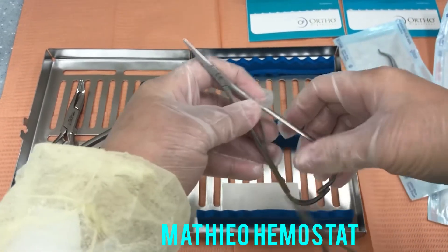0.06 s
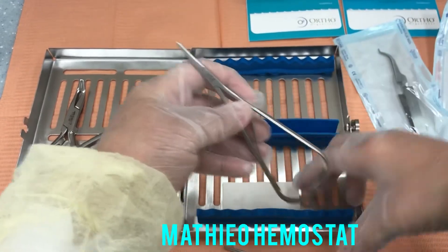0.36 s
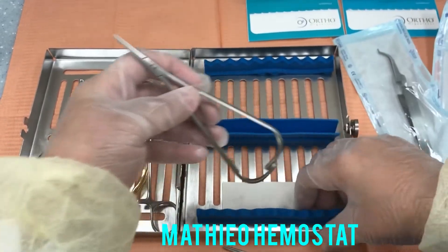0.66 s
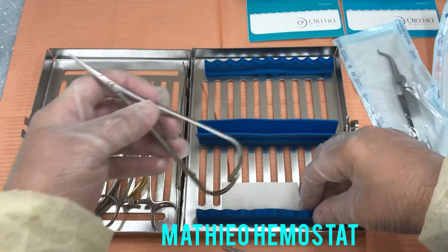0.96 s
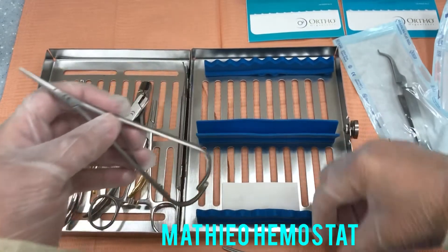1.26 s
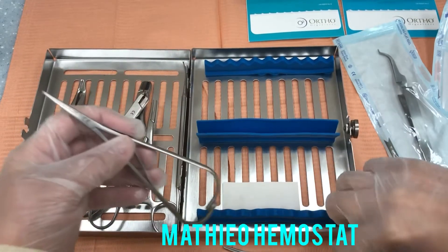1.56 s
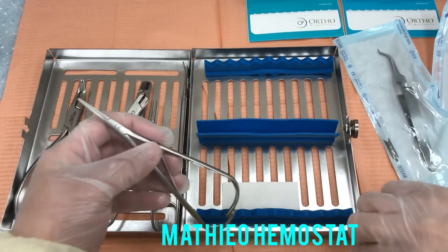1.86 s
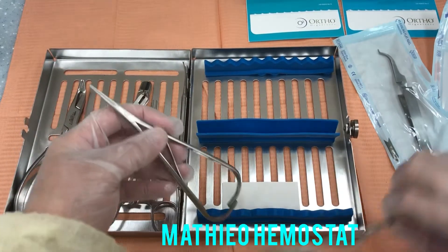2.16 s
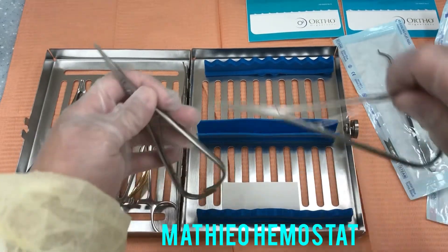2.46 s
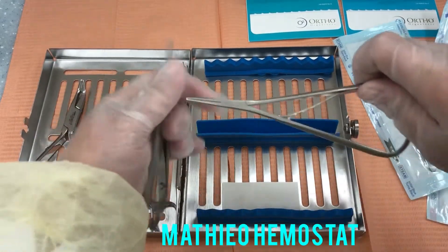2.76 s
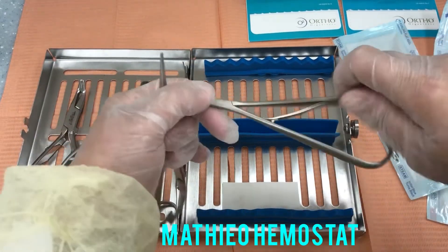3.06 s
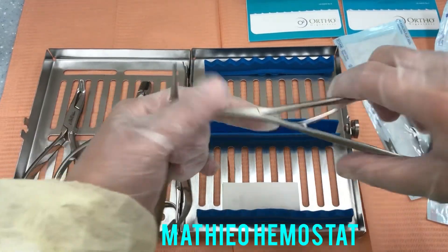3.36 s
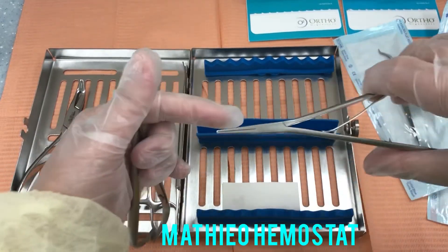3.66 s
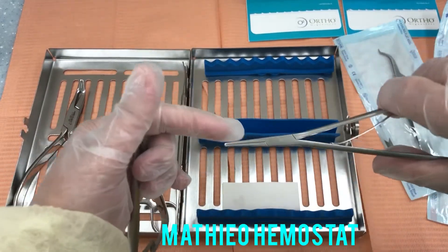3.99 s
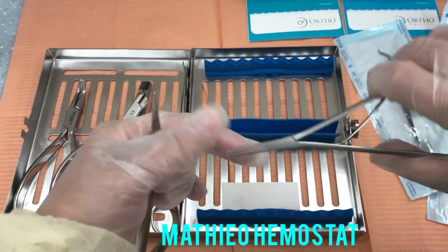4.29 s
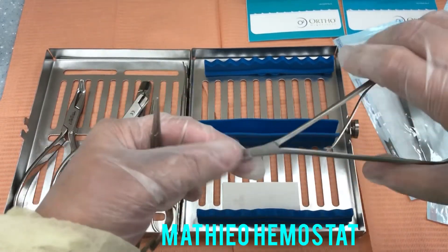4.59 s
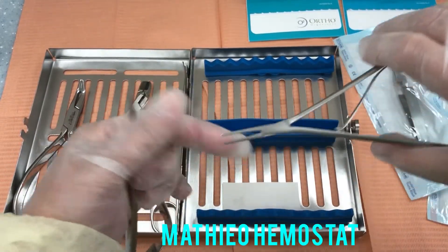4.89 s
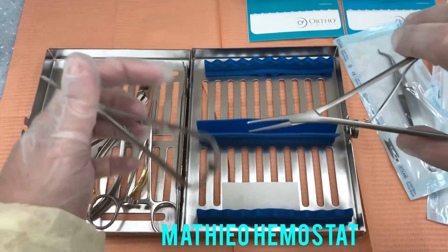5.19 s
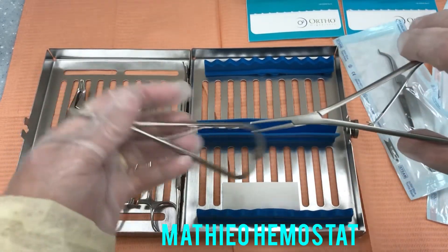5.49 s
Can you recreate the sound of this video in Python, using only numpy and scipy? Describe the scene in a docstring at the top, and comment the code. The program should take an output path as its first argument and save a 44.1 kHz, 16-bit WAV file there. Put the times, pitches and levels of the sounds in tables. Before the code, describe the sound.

Close up in a quiet clinic room, a steel instrument lands in a metal tray with a bright, bouncing clatter and a low thump from the table. Thin gloves rustle faintly. A softer scrape and clink follow, then a dull knock. Later a clamp's ratchet gives two sharp clicks and several lighter ones. Ventilation hums low throughout.

```python
"""A steel instrument, set into a slotted steel tray by gloved hands, clinks, bounces and slides.
Each contact is a chattering burst that rings tray and instrument; the table under them thumps.
A clamp is drawn out over the slots, its ratchet clicked shut tooth by tooth, then eased open.
Gloves rustle, ventilation hums, and a faint flutter echo runs between table and ceiling."""
import sys
import numpy as np
from scipy import signal
from scipy.fft import rfft, irfft, next_fast_len
from scipy.io import wavfile
from scipy.ndimage import uniform_filter1d, map_coordinates

SR = 44100
rng = np.random.default_rng(int(sys.argv[2]) if len(sys.argv) > 2 else 0)


def int16_out(signal):
    """Quantize to a 16-bit WAV file."""
    q = np.round(np.clip(np.atleast_2d(signal).T, -1, 1) * 32767)
    wavfile.write(sys.argv[1], SR, q.astype(np.int16))


N = 248724
T = np.arange(N) / SR
HIT_T = np.arange(2 * (SR // 4)) / SR
HIT_HZ = np.fft.rfftfreq(len(HIT_T), 1 / SR)

# crowded modes of the tray floor (frequency [Hz], gain [dB])
FLOOR_SPECTRUM = [(150, -11), (400, -12), (900, -11.5), (2400, -14), (5000, -15), (10000, -22),
                  (16000, -23)]


def tray_clinks():
    """An instrument lands and bounces; every contact sets the thin steel ringing."""
    # contacts (time [s], level [dB], low clank [dB], treble [dB], slide [dB], instrument [dB])
    clinks = [(.0905, -9.5, 0, 3, -14.5, 10.5), (.1252, -22, -2.5, -2, -5, -3),
              (0.139, -29.5, -2, 5, -7, -7), (0.1468, -28, 0.5, 3, -6, 1), (.1718, -36, -13, 6, -1.5, -8),
              (0.184, -27.5, -4, 2.5, -6, 2.5), (.191, -32.5, -3, -7, -6, -2),
              (.204, -34.5, -1, 5, -3.5, -10.5), (0.2424, -41.5, 11, -8, 1, -20),
              (0.249, -32, 5.5, 7, -33, -8), (0.2724, -21.5, 0, -6, -4.5, -5.5),
              (.2961, -36, 21, -29, -1, -20), (0.3226, -34, 6, -15, 4, -26),
              (1.8126, -29, -6.5, -1.5, -29, -20), (1.825, -40, 17, -15, -1.5, -22),
              (1.8366, -34.5, -2, -8, -10, -22), (1.8478, -37, -5, -19, -7.5, -20)]
    # damped tray resonances (frequency [Hz], width [Hz], gain [dB])
    tray_peaks = [(1247, 90, -9), (1650, 97, 4), (2080, 90, -13), (2580, 110, -6.5), (2850, 97, -3),
                  (3634, 130, -3.5), (4122, 77, 0.5), (5430, 170, -7.5), (5960, 160, -8), (6400, 130, -7),
                  (7000, 70, -8), (7360, 66, -17), (8200, 240, -13), (8730, 130, -11), (9270, 130, -11.5),
                  (10030, 75, -6.5), (10900, 120, -14.5)]
    # resonances of the landing instrument (frequency [Hz], width [Hz], gain [dB])
    tool_peaks = [(2504, 95, -10), (3360, 200, -5), (4200, 120, -11.5), (4940, 480, -9), (5777, 87, -7),
                  (6000, 160, -6.5), (6830, 56, 2.5), (7200, 150, -2), (8460, 170, -4.5), (8800, 110, -9),
                  (10400, 150, -11.5), (11425, 170, -5.5), (12050, 83, -4), (12370, 80, -10),
                  (14700, 100, -8), (15800, 80, -12.5)]
    # lasting ring of tray and instruments (frequency [Hz], level [dB], t60 [s])
    lasting_modes = [(1245, 4, .28), (1590, -5, .2), (1670, -4, .28), (1742, -5.5, .22), (2170, -4.5, .3),
                     (2812, -1, 0.13), (2976, -4.5, 0.2), (3495, -2.5, .28), (4165, -2, .28),
                     (5850, -2, .22), (6000, -3, .25), (6260, -2.5, .3), (6900, 4, .19), (7280, -3, .25),
                     (8640, 0, .42), (9600, -2, 0.21), (11320, -5.5, 0.17), (11900, -5.5, .25),
                     (12527, -9, .25)]
    # instrument still ringing in the hand (frequency [Hz], level [dB], t60 [s])
    held_modes = [(3784, -9.5, 0.22), (4480, -9.5, 0.42), (6800, -5, 0.13), (8565, -6.5, 0.16),
                  (12000, -2.5, 0.071), (12620, -15, 0.12), (14970, -5, 0.17)]
    out = np.zeros(N)
    attack = 1 - np.exp(-HIT_T / 0.0015)
    add(out, 0, amp(-49) * ring(held_modes, hardness(0, 0), scatter_db=0) * attack)
    for time_s, level_db, low_db, treble_db, slide_db, tool_db in clinks:
        colour = hardness(low_db, treble_db)
        tray = resonances(strike_spot(tray_peaks, scatter_db=1), HIT_HZ)
        tray = np.hypot(tray, amp(log_interp(FLOOR_SPECTRUM, HIT_HZ)))
        # a blow on the tip rings the instrument, a broad one mostly the tray
        tool = amp(tool_db) * resonances(strike_spot(tool_peaks, scatter_db=1.5), HIT_HZ)
        clink = contact(colour * np.hypot(tray, tool), slide_db, chatter_s=0.0056, slide_t60_s=0.13)
        lasting = amp(-25.5) * ring(lasting_modes, colour, scatter_db=1)
        add(out, time_s, amp(level_db) * (clink + lasting))
    return out


def contact(gain, slide_db, chatter_s, slide_t60_s):
    """Steel chatters on steel for a few ms, then slides to rest."""
    burst = rfft(rng.standard_normal(len(HIT_T)) * np.exp(-(HIT_T / chatter_s) ** 2))
    # partly whitened, so the resonances give most of the colour
    force = irfft(burst / minimum_phase(np.sqrt(np.abs(burst))))
    force *= np.exp(-(HIT_T / (2 * chatter_s)) ** 2)
    blow = irfft(rfft(force) * minimum_phase(gain))
    blow /= np.sqrt(uniform_filter1d(blow ** 2, size=SR // 500).max())  # loudest 2 ms at rms 1
    stick_slip = amp(1.6 * wobble(300)[:len(HIT_T)])
    friction = rng.standard_normal(len(HIT_T)) * stick_slip
    slide = unit_rms(irfft(rfft(friction) * gain))
    return blow + amp(slide_db) * slide * decay(slide_t60_s)


def ring(modes, gain, scatter_db):
    """Struck modes decay from random phases, starting near rms 1."""
    hz, level_db, t60_s = np.transpose(modes)
    sizes = amp(level_db + scatter_db * rng.standard_normal(len(hz))) * np.interp(hz, HIT_HZ, gain)
    phases = rng.uniform(0, 2 * np.pi, len(hz))
    tones = sum(size * np.sin(2 * np.pi * mode_hz * HIT_T + phase) * decay(mode_t60_s)
                for size, mode_hz, phase, mode_t60_s in zip(sizes, hz, phases, t60_s))
    return np.sqrt(2) * tones / np.linalg.norm(sizes)


def hardness(low_db, treble_db):
    """Colour of one contact: hard tips are bright, broad contacts clank."""
    return amp(log_interp([(1700, low_db), (2600, 0), (7500, 0), (13000, treble_db)], HIT_HZ))


def strike_spot(peaks, scatter_db):
    """Each point of contact drives the resonances at new strengths."""
    return np.asarray(peaks) + np.outer(scatter_db * rng.standard_normal(len(peaks)), [0, 0, 1])


def ratchet():
    """Teeth snap past each other; the hand damps the clamp almost at once."""
    # tooth and hinge clicks (time [s], level [dB], low [dB], treble [dB], snap [Hz], ping [Hz], jaw [dB])
    teeth = [(3.6438, -20, 1, 1.5, 5530, 8450, 3.5), (3.7228, -21.5, 4.5, -2, 5570, 7290, 7),
             (3.8212, -38, 7, -1.5, 4310, 11000, -6.5), (4.0581, -47, 8.5, -14, 5350, 6640, -6),
             (4.088, -37.5, -8, -5, 3550, 6750, -13), (4.125, -39, 3, -4, 5660, 6350, -18),
             (4.1673, -40.5, 4.5, -2.5, 3450, 9500, -13)]
    # resonances of the held clamp (frequency [Hz], width [Hz], gain [dB])
    jaw_peaks = [(2350, 143, -12), (3450, 240, -11), (4320, 150, -13), (5590, 200, -9.5),
                 (6420, 230, -10.5), (7280, 350, -4.5), (8430, 120, -3.5), (9270, 160, -5),
                 (9900, 220, -10), (10300, 310, -7.5), (11100, 230, -3), (12800, 200, -2), (14000, 104, 6),
                 (14200, 330, 0.5), (14400, 280, 1.5), (15200, 230, 0.5)]
    # bare snap of a tooth (frequency [Hz], gain [dB])
    snap_spectrum = [(200, -16.5), (900, -11.5), (1700, -19.5), (3500, -16), (8000, -14), (16000, -11.5)]
    out = np.zeros(N)
    for time_s, level_db, low_db, treble_db, snap_hz, ping_hz, jaw_db in teeth:
        # arm tension, and so pitch, changes from tooth to tooth
        arms = resonances([(snap_hz, 300, -10), (ping_hz, 220, -12)], HIT_HZ)
        tooth = np.hypot(arms, amp(log_interp(snap_spectrum, HIT_HZ) - 7))
        jaws = amp(jaw_db) * resonances(strike_spot(jaw_peaks, scatter_db=1.5), HIT_HZ)
        gain = hardness(low_db, treble_db) * np.hypot(jaws, tooth)
        add(out, time_s, amp(level_db) * contact(gain, slide_db=-22, chatter_s=0.006, slide_t60_s=0.094))
    return out


def finger_ticks():
    """The clamp shifts in the fingers with small dull ticks."""
    # touches (time [s], level [dB], low [dB], treble [dB], pitch [Hz], slide [dB])
    touches = [(1.228, -53, 0, -5.5, 3300, -7), (1.6511, -49.5, 24.5, -7.5, 3550, -13),
               (2.067, -46.5, 14.5, -8, 3230, -9.5), (3.057, -45, -1, -3, 5050, 4),
               (3.4446, -57, -12, -13.5, 5550, -14.5), (4.4528, -57, -4, -14.5, 3340, -5.5),
               (4.725, -56.5, 2.5, 7.5, 3530, -7.5)]
    out = np.zeros(N)
    for time_s, level_db, low_db, treble_db, pitch_hz, slide_db in touches:
        steel = resonances([(pitch_hz, 1000, 0), (9000, 9000, -8)], HIT_HZ)
        gain = hardness(low_db, treble_db) * steel
        add(out, time_s, amp(level_db) * contact(gain, slide_db, chatter_s=0.0049, slide_t60_s=0.11))
    return out


def table_thumps():
    """The tray thumps on the table with three low modes, then single dull knocks follow."""
    # thump modes (time [s], level [dB], frequency [Hz], t60 [s])
    thump_modes = [(0.097, -25, 77, 0.39), (0.099, -25.5, 113.7, 0.35), (.091, -34, 200, 0.14),
                   (.245, -37.5, 272, 0.083), (0.273, -42, 490, 0.024), (1.23, -39, 63, 0.31),
                   (2.068, -31.5, 560, 0.025)]
    out = np.zeros(N)
    for time_s, level_db, hz, t60_s in thump_modes:
        attack = 1 - np.exp(-HIT_T * hz)
        add(out, time_s, amp(level_db) * attack * decay(t60_s) * np.sin(2 * np.pi * hz * HIT_T))
    return out


def slot_scrape():
    """A tip dragged over the slots catches and slips in tiny grains."""
    # tip strokes (peak time [s], level [dB], rise [s], fall [s])
    drags = [(1.765, -49.5, 0.033, 0.054), (1.83, -38, 0.03, 0.024), (2.0, -58, 0.058, 0.023),
             (3.3, -60, 0.046, 0.031)]
    # resonances of the slotted floor (frequency [Hz], width [Hz], gain [dB])
    slot_peaks = [(766, 560, -0.5), (1590, 110, 13), (2590, 150, 1.5), (3520, 250, 1), (6000, 280, -17),
                  (8350, 100, -15), (9000, 150, -18)]
    slips = rng.standard_normal(N) * amp(2.2 * wobble(400))
    floor = lambda hz: np.hypot(resonances(slot_peaks, hz), amp(log_interp(FLOOR_SPECTRUM, hz) - 9))
    return swells(drags) * unit_rms(filtered(slips, floor))


def arm_slides():
    """A thin arm slides along steel; gritty friction excites one resonance."""
    # arm strokes (peak time [s], level [dB], rise [s], fall [s], pitch [Hz])
    strokes = [(1.235, -62.5, 0.054, 0.024, 3380), (1.36, -58, 0.033, .025, 3450),
               (1.91, -60, .03, 0.089, 4580), (2.19, -60.5, 0.032, 0.055, 4370),
               (2.21, -64.5, .06, 0.056, 5450), (3.07, -60, 0.0081, .016, 5000)]
    out = np.zeros(N)
    slips = rng.standard_normal(N) * amp(4.2 * wobble(300))
    for *stroke, pitch_hz in strokes:
        out += swells([stroke]) * unit_rms(resonate(slips, pitch_hz, width_hz=450))
    return out


def gloves():
    """Thin gloves rub on steel and on each other with a fine crinkle."""
    # first row: soft hiss fading with the opening steel ring; later rows: grip shifts
    # (peak time [s], level [dB], rise [s], fall [s])
    hiss_swells = [(.005, -46.5, 0.018, 0.02), (.075, -57, 0.012, 0.022), (.48, -58.5, 0.093, .06),
                   (.7, -58, .016, .055), (.99, -67, 0.044, .1), (1.22, -64.5, .06, 0.086),
                   (1.44, -57, 0.092, .06), (1.615, -59.5, .014, 0.051), (1.745, -53, 0.036, 0.09),
                   (1.895, -45.5, 0.015, 0.032), (1.99, -54.5, .03, 0.023), (2.135, -52.5, 0.014, 0.042),
                   (2.195, -51, .025, 0.035), (2.27, -61, .05, 0.12), (2.69, -58, 0.12, 0.035),
                   (2.83, -61, 0.0093, 0.017), (2.998, -47.5, .008, 0.016), (3.085, -54, 0.035, 0.047),
                   (3.284, -52.5, 0.0095, .009), (3.33, -62.5, 0.11, .07), (4.33, -64, .03, .09),
                   (4.555, -61.5, 0.026, 0.029), (4.97, -58, 0.048, 0.069), (5.19, -62.5, 0.012, 0.037),
                   (5.355, -60.5, .022, .04), (5.54, -66.5, 0.14, 0.1)]
    # glove rustle (frequency [Hz], relative density [dB])
    rustle_spectrum = [(1200, -16.5), (2500, -2), (4500, -5.5), (7000, -0.5), (11000, -1), (15500, -6)]
    crinkle = unit_rms(noise(rustle_spectrum) * amp(2.1 * wobble(540) + 1.9 * wobble(45)))
    # broad resonances of the rubbed steel, each swelling at random
    steel = sum(resonate(rng.standard_normal(N), hz, width_hz=900) * amp(2.9 * wobble(25))
                for hz in (3400, 4300, 5100))
    holding_db = -76
    return np.hypot(swells(hiss_swells), amp(holding_db)) * (crinkle + amp(-8.5) * unit_rms(steel))


def room(x):
    """Sound bounces between table and ceiling and leaves a short faint tail."""
    round_trip_s = 0.0208
    tail = decay(t60_s=0.33)
    response = amp(-21.5) * rng.standard_normal(len(HIT_T)) * tail / np.linalg.norm(tail)
    for trip in range(1, 4):
        add(response, trip * round_trip_s, np.array([amp(-22 - 5 * trip)]))
    return x + signal.fftconvolve(x, response)[:N]


def ventilation():
    """A slowly swelling hum and two weaker fan tones over duct rumble and air hiss."""
    # swell of the main hum (time [s], level [dB])
    hum_levels = [(0.3, -42.5), (0.49, -48), (1.28, -45), (1.55, -57), (1.74, -42.5), (2.16, -54),
                  (2.35, -43), (2.92, -59), (2.98, -44.5), (3.24, -41.5), (3.48, -49.5), (4.03, -45.5),
                  (4.46, -57), (4.7, -42.5), (5.15, -52.5), (5.64, -44)]
    # weaker tones (frequency [Hz], level [dB], waver [dB], waver rate [Hz])
    fans = [(90.4, -55.5, -5.5, 5.4), (314.1, -67.5, 3, 40)]
    # duct rumble (frequency [Hz], relative density [dB])
    duct_spectrum = [(20, -20.5), (45, -13), (70, -6), (110, 0), (150, -1), (215, -3.5), (260, -15.5),
                     (500, -54)]
    # air hiss (frequency [Hz], relative density [dB])
    air_spectrum = [(130, -30.5), (220, -1), (259, -8.5), (315, -0.5), (511, -8.5), (549, -7.5),
                    (634, -10.5), (1090, -12), (1190, -15), (2430, -22), (3020, -26), (5080, -29),
                    (7530, -37.5), (11000, -44), (16000, -55)]
    hum_gain = amp(np.interp(T, *np.transpose(hum_levels)))
    hum = hum_gain * unit_rms(fan_tone(hz=113.2, waver_db=-9, rate_hz=11))
    tones = sum(amp(db) * fan_tone(hz, waver_db, rate_hz) for hz, db, waver_db, rate_hz in fans)
    return hum + tones + amp(-48.5) * noise(duct_spectrum) + amp(-53) * noise(air_spectrum)


def fan_tone(hz, waver_db, rate_hz):
    """A steady tone that wavers in strength and phase."""
    in_phase = amp(waver_db) * unit_rms(wobble(rate_hz))
    quadrature = amp(waver_db) * unit_rms(wobble(rate_hz))
    phase = 2 * np.pi * hz * T
    return (np.sqrt(2) + in_phase) * np.sin(phase) + quadrature * np.cos(phase)


def amp(db):
    """Decibels to gain."""
    return 10 ** (np.asarray(db) / 20)


def unit_rms(x):
    """Scale to rms 1."""
    return x / np.sqrt(np.mean(x ** 2) + 1e-20)


def log_interp(points, hz):
    """Interpolate (frequency [Hz], value) points on a log frequency axis."""
    knots_hz, values = np.transpose(points)
    return np.interp(np.log(hz + 1), np.log(knots_hz + 1), values)


def decay(t60_s):
    """Envelope falling 60 dB in t60_s."""
    return np.exp(-np.log(1000) * HIT_T / t60_s)


def swells(strokes):
    """Gain of strokes that each rise to a peak and fall away, summed in power."""
    shape = 1.25  # 1 = pointed, 2 = rounded
    power = np.zeros(N)
    for peak_s, level_db, rise_s, fall_s in strokes:
        away = np.maximum((peak_s - T) / rise_s, (T - peak_s) / fall_s)
        near = away < 10
        power[near] += (amp(level_db) * np.exp(-away[near] ** shape)) ** 2
    return np.sqrt(power)


def wobble(rate_hz):
    """Smooth random curve, rate_hz knots a second."""
    return map_coordinates(rng.standard_normal(int(N * rate_hz / SR) + 4), [T * rate_hz])


def filtered(x, gain):
    """Zero-phase filter with response gain(hz)."""
    size = next_fast_len(N + SR // 2)
    return irfft(rfft(x, size) * gain(np.fft.rfftfreq(size, 1 / SR)), size)[:N]


def noise(spectrum):
    """Coloured noise of rms 1."""
    return unit_rms(filtered(rng.standard_normal(N), lambda hz: amp(log_interp(spectrum, hz))))


def resonances(peaks, hz):
    """Gain of (frequency [Hz], width [Hz], gain [dB]) resonances, summed in power."""
    responses = (amp(db) * hz * width_hz / (centre_hz ** 2 - hz ** 2 + 1j * hz * width_hz)
                 for centre_hz, width_hz, db in peaks)
    return np.sqrt(sum(np.abs(response) ** 2 for response in responses))


def resonate(x, centre_hz, width_hz):
    """Filter by the squared gain of one resonance."""
    return filtered(x, lambda hz: resonances([(centre_hz, width_hz, 0)], hz) ** 2)


def minimum_phase(gain):
    """Causal frequency response with this gain."""
    cepstrum = irfft(np.log(gain + 1e-6))
    half = len(cepstrum) // 2
    return np.exp(rfft(np.r_[cepstrum[0], 2 * cepstrum[1:half], np.zeros(half)]))


def add(track, time_s, sound):
    """Mix a sound into the track at time_s."""
    part = track[max(round(time_s * SR), 0):][:len(sound)]
    part += sound[:len(part)]


def scene():
    """Steel handled on the table, in the humming room."""
    impacts = tray_clinks() + ratchet() + finger_ticks() + table_thumps()
    friction = slot_scrape() + arm_slides() + gloves()
    return (room(impacts + friction) + ventilation())[None]


def record(dry):
    """The level dips briefly once; the top treble is cut off steeply."""
    cutoff_hz, hz_per_db = 15900, 16
    dip = amp(np.interp(T, [1.132, 1.137, 1.144, 1.158], [0, -12, -9, 0]))
    lowpass = lambda hz: amp(-np.clip((hz - cutoff_hz) / hz_per_db, 0, 120))
    return filtered(dry[0] * dip, lowpass)[None]


dry = scene()
out = record(dry)
int16_out(out)
```